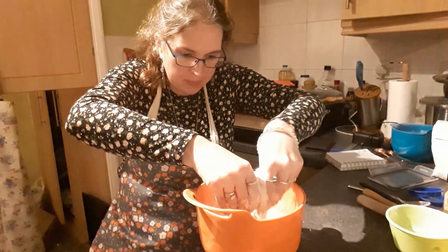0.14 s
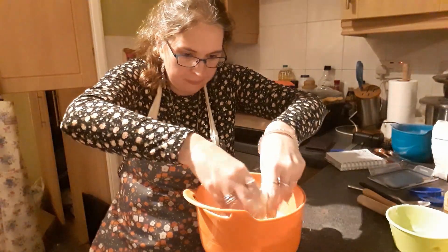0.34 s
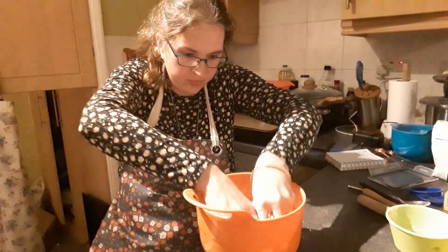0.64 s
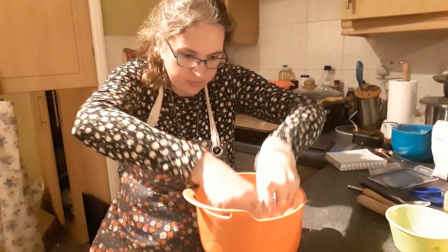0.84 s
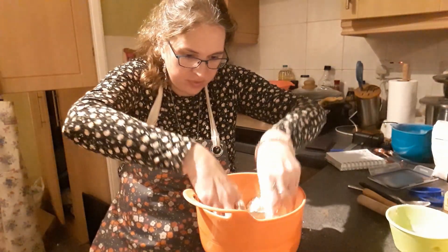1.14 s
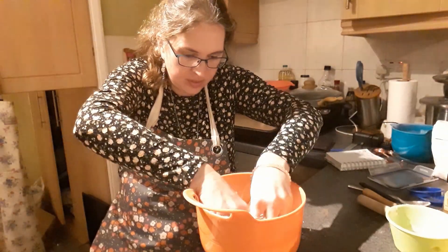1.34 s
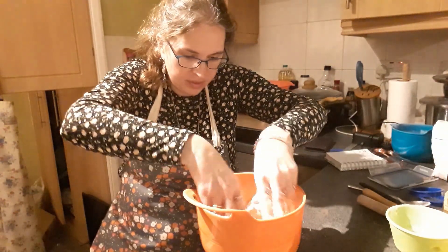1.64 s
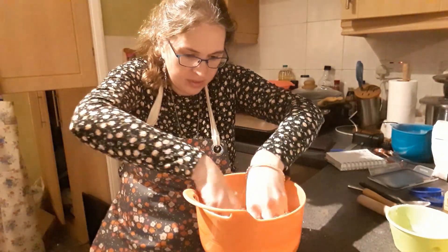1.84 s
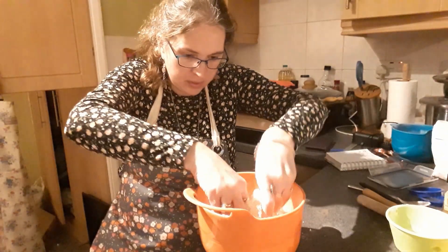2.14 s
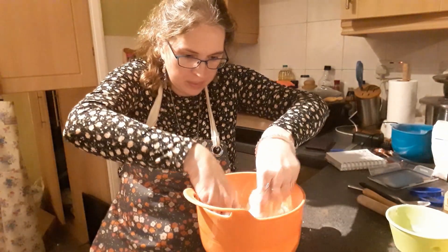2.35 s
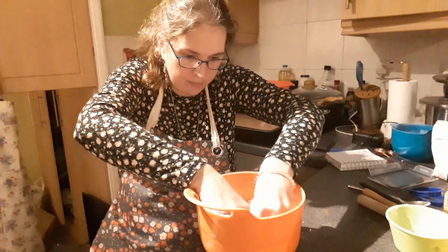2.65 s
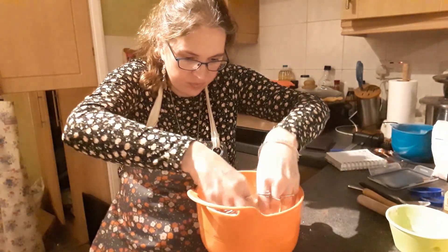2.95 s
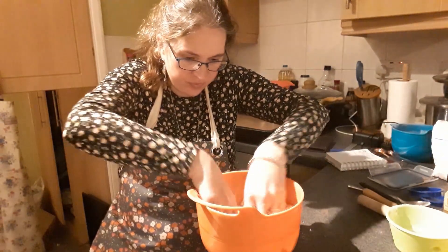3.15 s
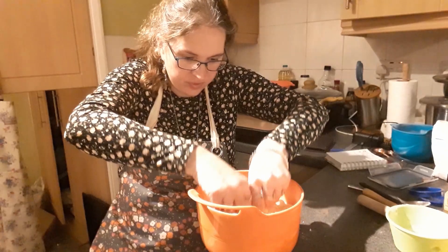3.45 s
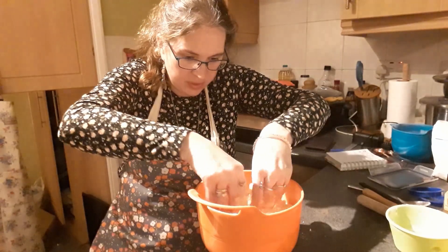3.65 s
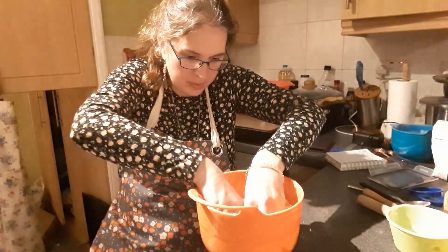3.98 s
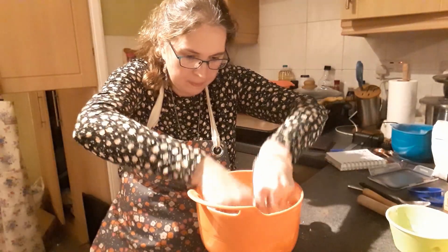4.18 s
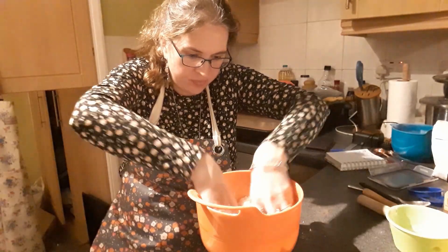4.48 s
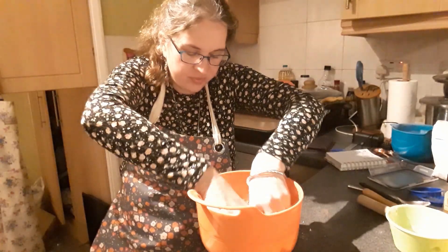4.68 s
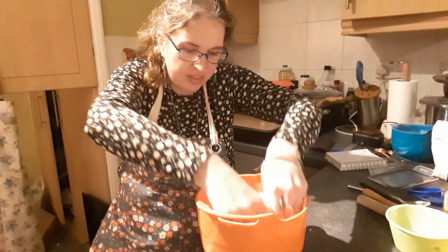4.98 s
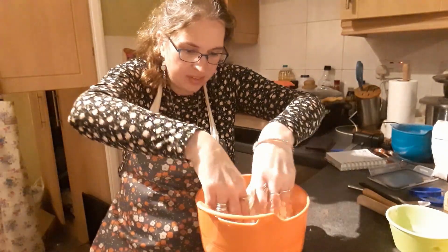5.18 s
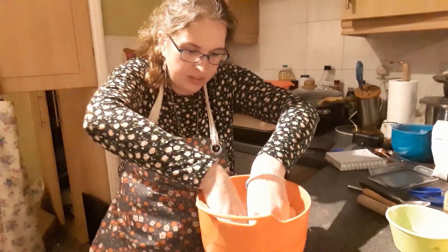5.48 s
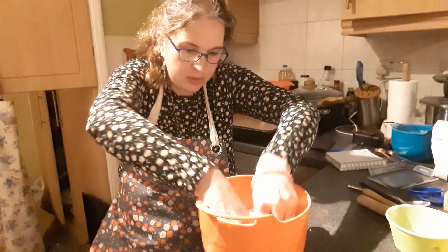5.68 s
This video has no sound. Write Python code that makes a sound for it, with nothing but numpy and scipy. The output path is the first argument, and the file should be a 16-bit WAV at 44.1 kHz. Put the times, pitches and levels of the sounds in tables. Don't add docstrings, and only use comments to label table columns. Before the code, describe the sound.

Dry flour whispers under rubbing fingers while nails, pads and a metal ring clack sporadically against a plastic bowl in a small kitchen.

```python
import sys
import numpy as np
from scipy import signal
from scipy.fft import rfft, irfft
from scipy.io import wavfile
from scipy.ndimage import uniform_filter1d

SR = 44100
rng = np.random.default_rng(int(sys.argv[2]) if len(sys.argv) > 2 else 0)


def wav_record(signal):
    frames = np.transpose(np.atleast_2d(signal))
    bounded = np.clip(frames, -1, 1)
    quanta = np.round(bounded * 32767).astype(np.int16)
    wavfile.write(sys.argv[1], SR, quanta)


def voltage_ratio(level):
    return 10 ** (np.asarray(level, float) / 20)


N = 256662


def rms_one(x):
    return x / np.sqrt(np.mean(x ** 2) + 1e-20)


def at_hz(points, hz):
    table_hz, values = np.array(points).T
    return np.interp(np.log(hz + 1), np.log(table_hz), values)


def coloured(x, points):
    gain = voltage_ratio(at_hz(points, np.fft.rfftfreq(len(x), 1 / SR)))
    return irfft(rfft(x) * gain, len(x))


def band(x, low_hz, high_hz, order=3):
    sos = signal.butter(order, [low_hz, min(high_hz, 20000)], "band", fs=SR, output="sos")
    return signal.sosfilt(sos, x + 1e-18)


def ring(train, hz, t60):
    r = voltage_ratio(-60 / (t60 * SR))
    w = 2 * np.pi * hz / SR
    return signal.lfilter([0, np.sin(w)], [1, -2 * r * np.cos(w), r * r], train + 1e-18)


def clicks(times, db):
    train = np.zeros(N)
    train[np.round(np.asarray(times) * SR).astype(int)] = voltage_ratio(db)
    return train


def add(out, s, part):
    at = round(s * SR)
    out[at:at + len(part)] += part[:N - at]


def notes(times, dbs, pitches_hz, t60s):
    out, t = np.zeros(N), np.arange(SR // 4) / SR
    for s, db, hz, t60 in np.broadcast(times, dbs, pitches_hz, t60s):
        add(out, s, voltage_ratio(db - 60 * t / t60) * np.sin(2 * np.pi * hz * t))
    return out


# hum line in Hz, rms level in dB.
FRIDGE_HUM = [(100.1, -49), (200.2, -73), (300.3, -68.5)]
# frequency in Hz, level in dB per Hz.
ROOM_AIR = [(25, -16), (60, 3), (85, -4), (120, 0), (160, 5.5), (230, 5.5), (300, -4.5), (384, -8.5),
            (540, -6), (1160, -21.5), (2300, -24.5), (2680, -24), (2900, -13.5), (3300, -24), (16000, -24)]


def fridge():
    t = np.arange(N) / SR
    hum = np.zeros(N)
    for hz, db in FRIDGE_HUM:
        hum += np.sqrt(2) * voltage_ratio(db) * np.sin(2 * np.pi * (hz * t + rng.random()))
    return hum + voltage_ratio(-61.5) * rms_one(coloured(rng.standard_normal(N), ROOM_AIR))


# frequency in Hz, decay time t60 in seconds.
KITCHEN_T60 = [(150, 0.45), (500, 0.2), (2000, 0.29), (8000, 0.19), (15000, 0.064)]


def kitchen(x):
    room_db, fill_s = 10, 0.0059
    early_db, early_s = 1, 0.016
    clump_db, clump_s = 1, 0.003
    t = np.arange(SR // 2) / SR
    clumps = np.interp(t / clump_s, np.arange(500), rng.standard_normal(500))
    white = rng.standard_normal(len(t)) * voltage_ratio(clump_db * clumps)
    late = np.maximum(t - fill_s, 0)
    edges = 100 * 2 ** np.arange(0, 7.6, .5)
    echoes = np.zeros(len(t))
    for low, high in zip(edges, edges[1:]):
        t60 = at_hz(KITCHEN_T60, np.sqrt(low * high))
        echoes += band(white, low, high, order=1) * voltage_ratio(-60 * late / t60)
    response = rfft(echoes * voltage_ratio(early_db * np.exp(-t / early_s)))
    response /= np.sqrt(uniform_filter1d(np.abs(response) ** 2, size=100))
    echoes = irfft(response, len(t))[:SR // 5 * 2]
    echoes /= np.sqrt(np.sum(echoes ** 2))
    return voltage_ratio(room_db) * signal.fftconvolve(x, echoes)[:N]


# start in seconds, peak in dB, wall share in relative dB.
WORKTOP_BUMPS = [(1.598, -74, -8), (1.798, -57, 9), (2.499, -64, 5), (3.149, -57.5, -9), (3.603, -71.5, 18),
                 (3.741, -73, 15), (3.878, -56.5, -1), (4.155, -54, -14), (4.478, -47, -7),
                 (4.672, -54.5, -22), (5.359, -57, 9)]


def worktop_shake():
    s, peak_db, _ = np.transpose(WORKTOP_BUMPS)
    return notes(s, peak_db - 6, 35, 0.13)


# mode in Hz, level in dB, t60 in seconds.
ROCKING_MODES = [(171, 7, 0.16), (238, -8, 0.36)]
# mode in Hz, level in dB, t60 in seconds.
BOWL_MODES = [(470, 0, 0.14), (596, 15, 0.062), (623, 6, 0.018), (760, -25.5, 0.12), (1000, 0, 0.15),
              (1280, -19.5, 0.062)]


def bumps():
    s, peak_db, wall_db = np.transpose(WORKTOP_BUMPS)
    out = np.zeros(N)
    for hz, db, t60 in ROCKING_MODES:
        out += ring(clicks(s, peak_db + db - 4.5), hz, t60)
    for hz, db, t60 in BOWL_MODES[:3]:
        out += ring(clicks(s, peak_db + wall_db + db - 21.0), hz, t60)
    return out


# start in seconds, peak in dB, pitch in Hz, t60 in seconds.
RING_PINGS = [
    (.28, -65, 12900, .03),
    (2.117, -54, 13040, 0.018),
    (2.212, -63, 7460, 0.028),
    (2.27, -55, 12900, 0.023),
    (2.296, -59, 7700, .02),
    (2.651, -55, 13000, .03),
    (3.307, -52, 7350, 0.014),
    (3.38, -63.5, 7570, 0.0071),
    (3.571, -68, 5050, 0.017),
    (4.72, -41, 7570, 0.021),
]


def pings():
    return notes(*np.transpose(RING_PINGS))


# start in seconds, peak in dB, pitch in Hz.
NAIL_SNAPS = [
    (1.209, -38.5, 3100),
    (1.9152, -40, 7600),
    (2.4805, -27.5, 3520),
    (2.6508, -45, 7350),
    (3.738, -57, 3000),
    (4.666, -36, 2230),
    (4.8883, -26.5, 2920),
    (5.3411, -19.5, 4140),
]


def snaps():
    s, db, hz = np.transpose(NAIL_SNAPS)
    return notes(s, db - 6.0, hz, 0.017)


# mode in Hz, width in Hz, level in dB.
UPPER_WALL = [(596, 27.4, -3.5), (1253, 13, -18.5), (1810, 20, -12), (2110, 54, -3.5), (2505, 73, -4),
              (2680, 105, 0), (3040, 59, -4), (3440, 140, -2), (3720, 126, -1), (4030, 79, -9.5),
              (4100, 150, -22), (4800, 110, -10)]
# start in seconds, level in dB, freest pitch in Hz,
# lowest mode level in relative dB, lowest mode in Hz.
HAND_GRIPS = [
    (1.776, -38, 2370, 3.5, 596),
    (3.130, -29.5, 2970, -2, 625),
    (3.865, -33.5, 3290, -4.5, 470),
    (4.469, -31.5, 2700, -6, 585),
    (4.665, -41.5, 2850, 2, 974),
    (4.889, -46, 2900, -3, 580),
    (5.341, -41.5, 3400, -6, 953),
]


def held_wall():
    grip_db_per_octave, chance_db = 4.5, 3.5
    hz, width_hz, db = np.transpose(UPPER_WALL)
    t60 = np.log(1000) / np.pi / width_hz
    out = np.zeros(N)
    lucks = rng.standard_normal((len(HAND_GRIPS), len(UPPER_WALL)))
    for (s, level_db, free_hz, low_db, low_hz), luck in zip(HAND_GRIPS, lucks):
        held_db = -grip_db_per_octave * np.abs(np.log2(hz / free_hz)) + chance_db * luck
        held_db[0] = low_db
        out += notes(s, level_db + db + held_db, [low_hz, *hz[1:]], t60)
    return out


# partial in Hz, level in dB, t60 in seconds.
RING_PARTIALS = [(11300, -30, .012), (12950, -31, .025), (14600, -31, .012)]


def jingle(metal):
    t = np.arange(SR // 10) / SR
    rattle = rng.standard_normal(len(t)) * (rng.random(len(t)) < .04) * voltage_ratio(-60 * t / 0.27)
    rattle /= np.sqrt(np.sum(rattle ** 2))
    metal = 0.77 * metal + signal.fftconvolve(metal, 0.86 * rattle)[:N]
    out = band(metal, 10300, 15900)
    for hz, db, t60 in RING_PARTIALS:
        out += voltage_ratio(db) * ring(metal, hz, t60)
    return out


# start in seconds, peak in dB, wall boom in relative dB, ring
# jingle in relative dB, struck-spot pitch in Hz. Finger pads, each with a soft edge tick:
PADS_ON_WALL = [(1.21, -44, -24, -13, 3400), (1.7751, -18.5, -5.5, -20.5, 3540),
                (1.8172, -39, -16, -7, 2170), (2.5395, -46, -12, -6, 1550), (3.1424, -18, -1.5, -20, 3290),
                (3.865, -20, -10, -22, 2280), (3.8894, -22.5, -3.5, -11.5, 2360),
                (4.5009, -17, -22, -38, 3700), (4.6642, -21.5, -9, -18, 2500),
                (4.8888, -29, -13.5, -39, 3320), (5.3408, -24, -21, -14, 3860)]
FURTHER_KNOCKS_ON_WALL = [(0.8719, -45, 2.5, -21, 4400), (1.3676, -45, -0.5, -12, 3830),
                          (1.6868, -42, -20, -18, 3500), (1.788, -29, -20, -12, 2350), (1.9587, -43, -4, -24, 3770),
                          (2.4788, -32.5, -46, -18, 3460), (3.1295, -17, -7, -17.5, 3920),
                          (3.1551, -19.5, -15, -16, 2270), (3.1883, -26.5, -18, -10.5, 2300),
                          (3.3086, -46.5, -5, -4.5, 2500), (4.469, -17.5, -21, -14.5, 3000),
                          (4.5269, -19, -10, -18.5, 1590), (4.7391, -28.5, -10, -17, 2620),
                          (5.6676, -51.5, -16, -24, 2840)]
RING_ON_WALL = [
    (1.9147, -46.5, -27.5, 1.5, 2140),
    (2.114, -61, -16, 1, 2830),
    (2.213, -64, -10, 2, 3270),
    (2.6515, -61, 3, -5, 3220),
    (4.4896, -37.5, 15.5, 4, 2530),
    (4.718, -46.5, -27, 11.5, 2110),
]


def knocks():
    s, peak_db, boom_db, jingle_db, spot_hz = np.transpose(PADS_ON_WALL + FURTHER_KNOCKS_ON_WALL + RING_ON_WALL)
    counts = [len(PADS_ON_WALL), len(FURTHER_KNOCKS_ON_WALL), len(RING_ON_WALL)]
    tick_db = np.repeat([-10, -9, 4], counts)
    spot_db = 3 * rng.standard_normal((len(s), len(BOWL_MODES)))
    split_hz = 2500
    thinning_db = 2.5 * np.log2(spot_hz / split_hz)
    out = band(clicks(s, peak_db + 14), split_hz, 4500)
    out += band(clicks(s, peak_db + 15.5 - thinning_db), 1600, split_hz)
    out += notes(s, peak_db - 13.0, spot_hz, 0.007)
    out += band(clicks(s, peak_db + boom_db + 19.5), 700, 1300)
    out += band(clicks(s, peak_db + tick_db + 17.0), 5500, 8600)
    out += jingle(clicks(s, peak_db + jingle_db + 22.5))
    for (hz, level_db, t60), favour_db in zip(BOWL_MODES, spot_db.T):
        out += ring(clicks(s, peak_db + level_db - 35.0 + boom_db + favour_db), hz, t60)
    return out


# start in seconds, length in seconds, level in dB, centre in Hz.
WALL_DRAGS = [(0.014, 0.088, -69, 1890), (0.022, 0.096, -62.5, 4800), (0.316, 0.31, -68.5, 3300),
              (0.426, 0.052, -86, 2120), (0.527, 0.1, -53, 3640), (0.803, 0.12, -65, 1940),
              (1.365, 0.099, -66.5, 1390), (1.59, 0.073, -67.5, 1960), (1.694, 0.041, -100, 1900),
              (1.948, 0.043, -59.5, 600), (2.335, 0.14, -64, 3500), (2.387, 0.09, -65, 1470),
              (2.528, 0.088, -62.5, 1580), (2.535, 0.066, -56.5, 530), (2.692, 0.065, -58.5, 586),
              (3.583, 0.092, -64, 1000), (3.704, 0.086, -64.5, 696), (4.149, 0.053, -60, 497),
              (5.003, 0.17, -68.5, 1600), (5.341, 0.09, -52, 980), (5.529, 0.051, -54, 3540),
              (5.563, 0.072, -63, 1510), (5.66, 0.072, -58.5, 2960)]
# start in seconds, length in seconds, level in dB, centre in Hz.
SKIN_SQUEAKS = [
    (5.016, 0.14, -75, 1600),
    (5.147, 0.093, -67, 6050),
    (5.614, 0.071, -54.5, 5890),
]


def drags():
    t, out = np.arange(SR // 2) / SR, np.zeros(N)
    rows = [(*row, 73 + 0.22 * row[3], 0.093) for row in WALL_DRAGS]
    rows += [(*row, 55, 0.34) for row in SKIN_SQUEAKS]
    for s, length, db, hz, width_hz, rise_share in rows:
        white = rng.standard_normal(len(t))
        shape = np.clip(t / length / rise_share, 0, 1) * np.exp(-(t / length) ** 3)
        friction = band(white, hz - width_hz / 2, hz + width_hz / 2, order=2)
        add(out, s, voltage_ratio(db) * shape * rms_one(friction))
    return out


# time of the top in seconds, flour hiss in dB, swell in seconds,
# fade in seconds, pressure on the wall in relative dB.
RUBBING_STROKES = [(0.04, -66, 0.24, .2, -3), (0.33, -67.5, 0.17, 0.3, -4.5), (0.49, -57, .07, 0.16, -32),
                   (0.583, -55.5, 0.093, 0.24, -9.5), (0.876, -64, 0.06, 0.9, -4),
                   (1.19, -58.5, 0.21, 0.29, -12), (1.39, -61, 0.066, 0.13, -0.5),
                   (1.612, -74.5, 0.064, 0.16, 11), (1.735, -57.5, 0.051, 0.21, -17),
                   (2.0, -61, .3, 0.083, 0.5), (2.39, -55, 0.13, 0.19, -28),
                   (2.544, -52, 0.058, 0.097, -22), (2.72, -56.5, 0.13, 0.1, -0.5),
                   (3.115, -59, 0.064, 0.36, -5), (3.38, -62.5, .3, 0.055, -7.5),
                   (3.586, -72.5, 0.017, 0.08, 2), (3.78, -71, 0.17, 0.08, 0), (3.85, -56, 0.056, 0.27, -9),
                   (4.168, -68.5, 0.086, 0.066, -0.5), (4.453, -50, 0.074, 0.35, -14.5),
                   (4.875, -53, 0.14, 0.2, 2), (5.326, -57.5, 0.11, 0.44, -19),
                   (5.556, -53.5, .2, 0.094, -9.5), (5.67, -62.5, 0.036, .15, 3.5)]


def rubbing():
    range_db, curve = 20, 1.5
    grains_per_s = 6000
    s, hiss_db, swell, fade, press_db = np.transpose(RUBBING_STROKES)[:, :, None]
    t = np.arange(0, N + 64, 64) / SR
    stroke_db = hiss_db - range_db * np.maximum((s - t) / swell, (t - s) / fade) ** curve
    layers = [(1.0, 2300, 9000),
              (press_db - 5.5, 400, 1100),
              (press_db - 8, 1200, 2200),
              (-5, 10300, 15900)]
    sizes = voltage_ratio(1.87 * np.minimum(rng.exponential(1, (4, N)), 5)) * rng.choice([-1, 1], (4, N))
    grains = sizes * (rng.random((4, N)) < grains_per_s / SR)
    out = np.zeros(N)
    for layer_grains, (share_db, low_hz, high_hz) in zip(grains, layers):
        gain = np.sqrt(np.sum(voltage_ratio(stroke_db + share_db) ** 2, axis=0))
        out += np.interp(np.arange(N) / SR, t, gain) * rms_one(band(layer_grains, low_hz, high_hz))
    return out


def scene():
    wall = held_wall()
    struck = band(knocks() + wall + pings(), 330, 20000)
    struck += band(bumps(), 130, 2000, order=2)
    direct = voltage_ratio(-8.5) * struck + voltage_ratio(4.0) * band(wall, 230, 20000) + snaps() + worktop_shake()
    return (kitchen(struck) + direct + rubbing() + drags() + fridge())[None]


def roll_off(x):
    return signal.sosfilt(signal.butter(12, 16650, fs=SR, output="sos"), x)


# frequency in Hz, gain in dB.
MIC_COLOUR = [(300, -0.5), (4300, -2.5), (5200, -4), (7400, 2.5), (8700, -11.5), (10000, -9.5),
              (11300, -4.5), (13000, -6.5), (15600, -8), (16050, -38)]


def record(dry):
    ceiling = .17
    heard = coloured(dry[0], MIC_COLOUR)[None]
    mix = ceiling * np.tanh(heard / ceiling)
    return roll_off(mix)


dry = scene()
out = record(dry)
wav_record(out)
```